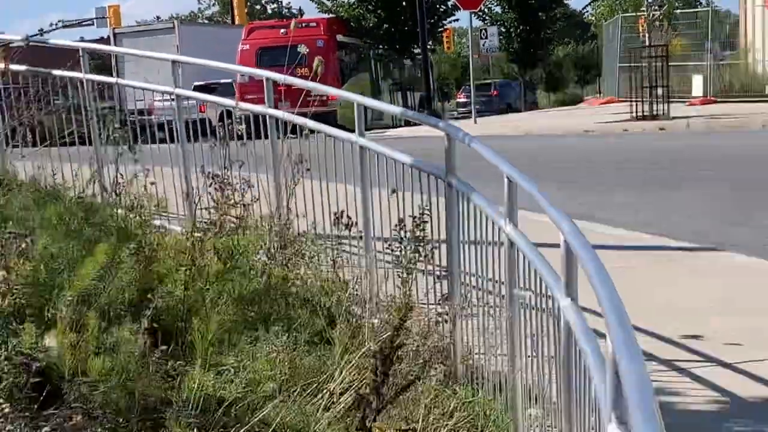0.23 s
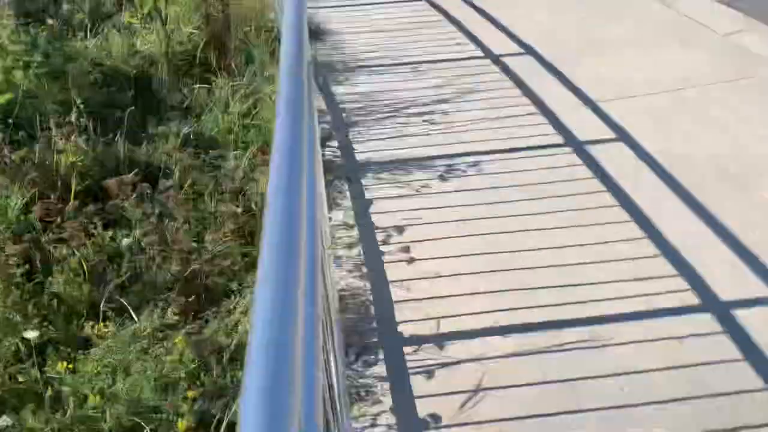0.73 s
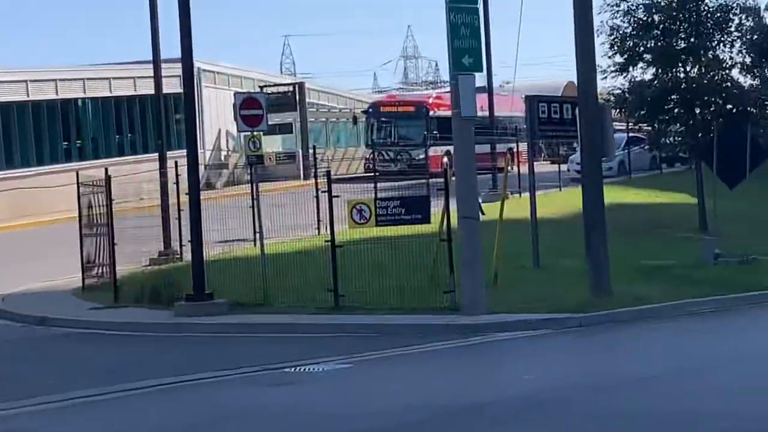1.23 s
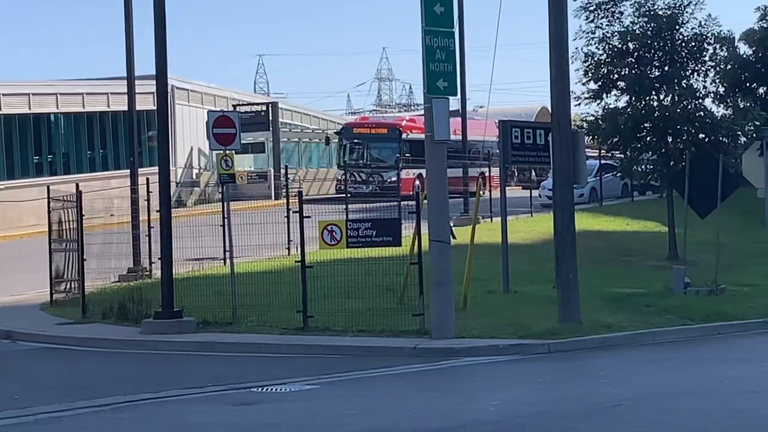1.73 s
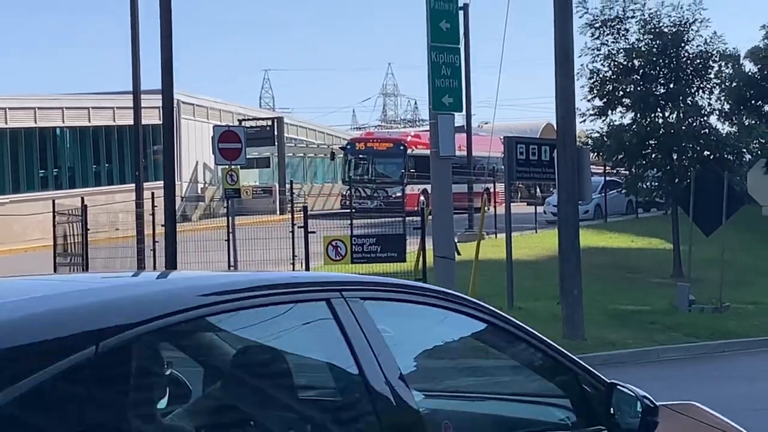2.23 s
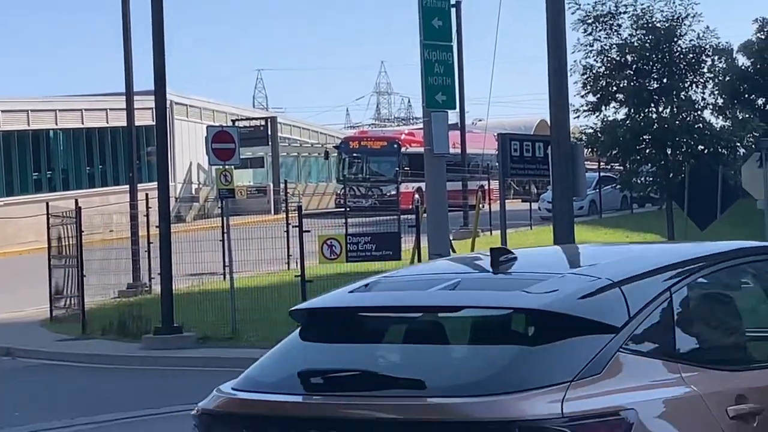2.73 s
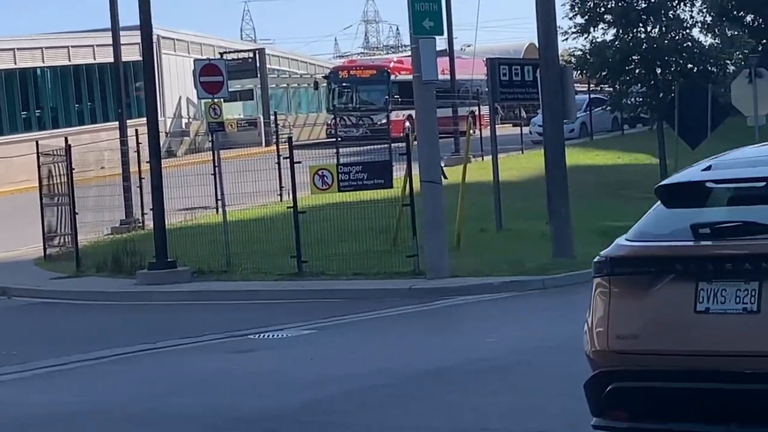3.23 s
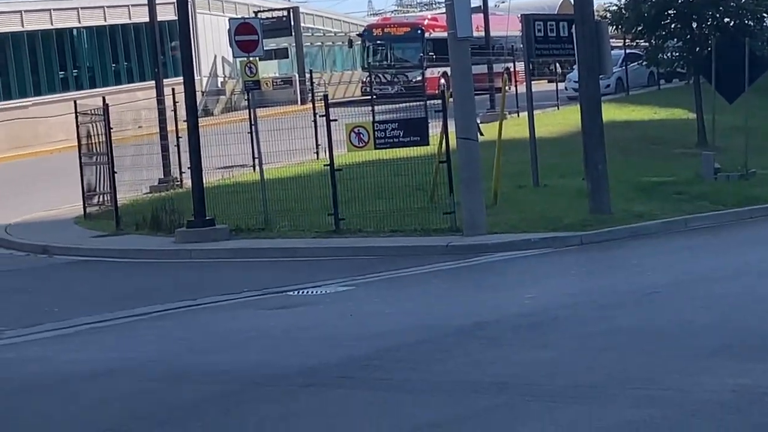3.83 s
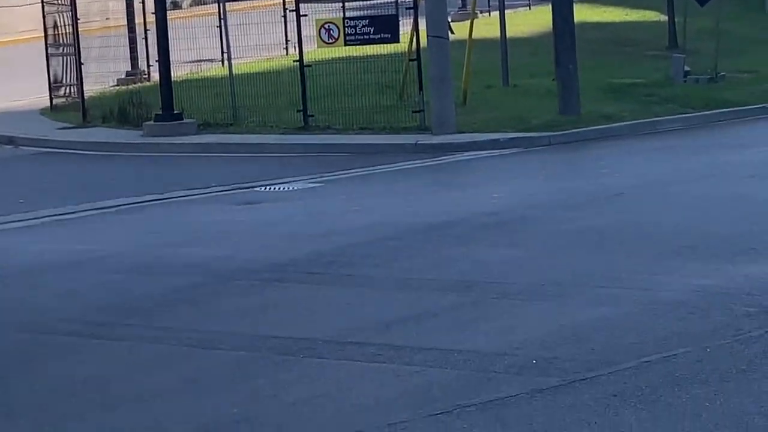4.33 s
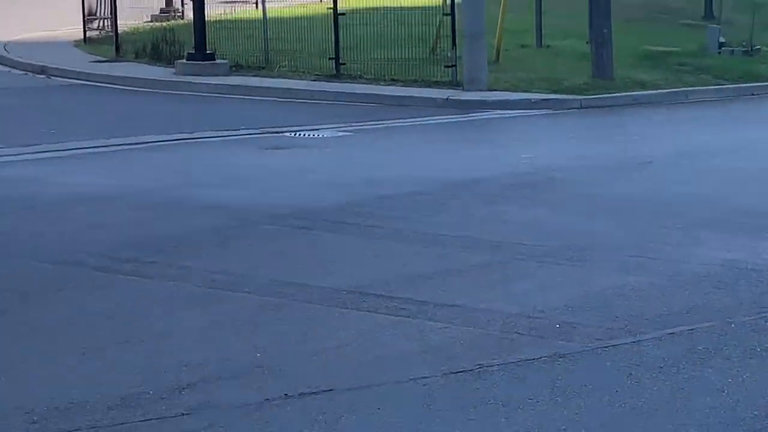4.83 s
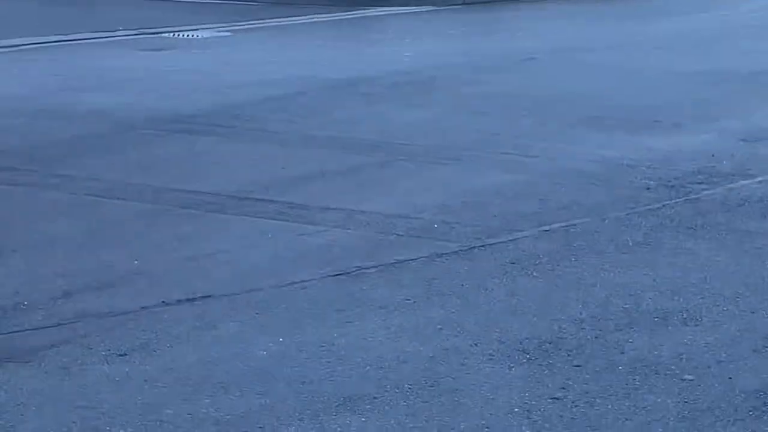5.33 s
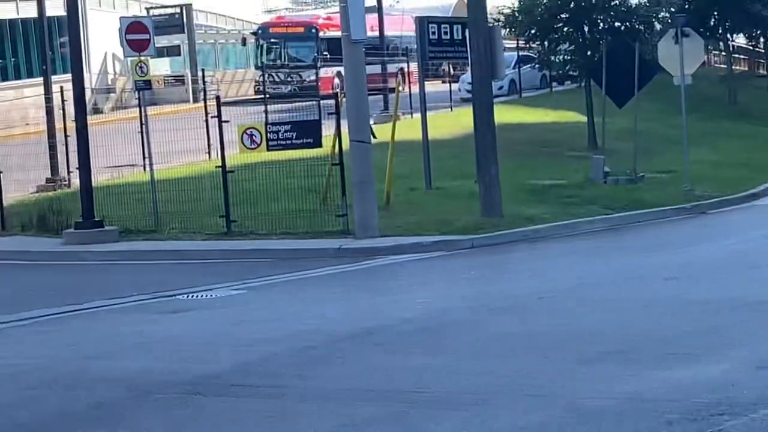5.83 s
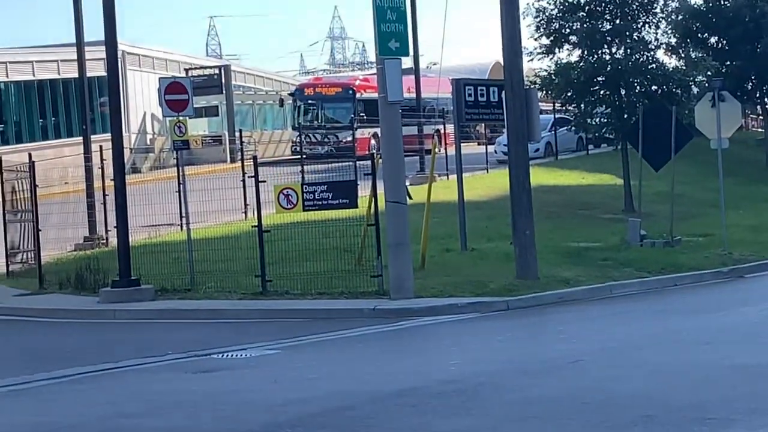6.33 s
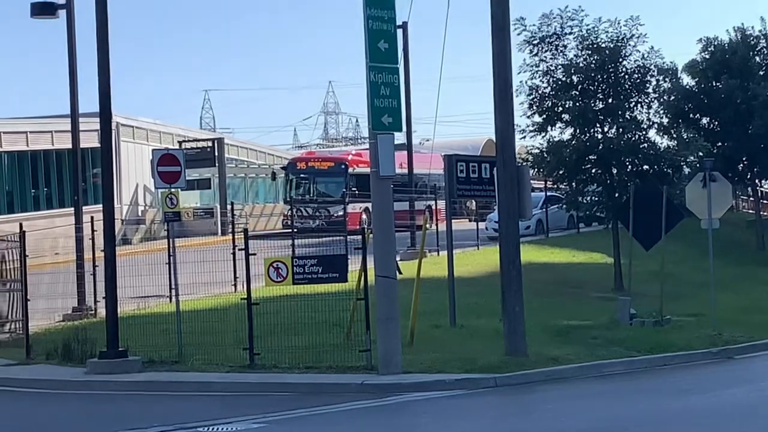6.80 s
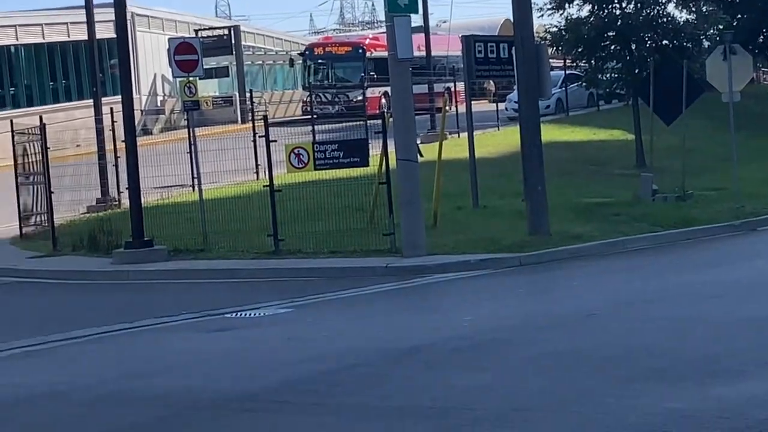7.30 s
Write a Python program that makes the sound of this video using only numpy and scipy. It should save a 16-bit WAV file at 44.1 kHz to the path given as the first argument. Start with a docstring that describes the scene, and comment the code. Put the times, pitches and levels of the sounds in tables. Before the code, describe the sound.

A quiet street corner opens with soft idling rumble and small handling knocks, then cuts abruptly to a bus yard. A deep diesel drone pulls strongly under traffic roar and tyre noise, with soft thuds over a road joint. The engine eases off and wavers, and two blasts of air hiss with a ringing whistle, the second about two seconds later. A handheld camera outdoors ends with a hard bump.

```python
"""A diesel bus pulls gently across a terminal yard: steady tones locked to its crankshaft make the drone,
a fuzzy high tone the turbo, and shaped noise with a ringing whistle two blasts from an air valve.
Behind it, filtered stereo noise makes the traffic roar, tyre wash and thuds of cars over a road joint.
It all opens on a quieter street corner of idling engines and soft noise, then cuts abruptly to the yard.
Knocks on the hand-held camera are clicks, short noise rubs and ringing modes of its case."""
import sys
import numpy as np
from scipy import signal
from scipy.fft import rfft, irfft, next_fast_len
from scipy.io import wavfile
from scipy.ndimage import uniform_filter1d, map_coordinates

SR = 44100
rng = np.random.default_rng(int(sys.argv[2]) if len(sys.argv) > 2 else 0)


def unload_audio(sound):
    """Save the sound as a 16-bit wav file, at the path given as the first command line argument."""
    columns = np.transpose(np.atleast_2d(sound))
    # keep every value between -1 and 1, then stretch to whole-number steps
    steps = np.round(np.clip(columns, -1, 1) * 32767)
    wavfile.write(sys.argv[1], SR, steps.astype(np.int16))


N = 333396

# Noise colours. Each row: frequency in Hz, relative density in dB per Hz (the layer sets the loudness).
CORNER_RUMBLE_COLOUR = [(22, -14), (45, -2.5), (62, -4), (76, -1.5), (92, -11.5), (120, -9), (170, -12),
                        (300, -25), (2000, -120)]
CORNER_STREET_COLOUR = [(150, -4), (330, 0), (700, -6), (1200, -13.5), (2600, -18), (3300, -23),
                        (3750, -19), (4100, -30), (5000, -43.5), (6800, -35), (9000, -53)]
STREET_RUMBLE_COLOUR = [(22, -20), (35, -3.5), (50, -1.5), (65, 3), (100, -4), (130, -6), (180, -4),
                        (240, -19.5), (700, -120)]
ROAR_COLOUR = [(30, -29), (70, -1.5), (100, -2.5), (150, 0.5), (220, -4), (310, -2.5), (430, -5.5),
               (540, -13), (760, -13.5), (1050, -25), (2000, -43.5), (5000, -110)]
TYRE_COLOUR = [(300, -27), (750, 3), (1050, 2.5), (1550, 2.5), (1950, -1), (2450, -3), (3300, -15.5),
               (3800, -13.5), (5400, -24), (6600, -29.5), (7600, -38), (9000, -42), (11000, -32),
               (13000, -58.5)]
BRIGHT_HISS_COLOUR = [(3500, -22), (5000, -7.5), (6500, 6), (7400, -7.5), (9000, -21), (12000, -32.5)]
ROAD_WASH_COLOUR = [(350, -20), (540, -2), (740, 2), (900, -2), (1400, -16), (1900, -20), (3000, -50)]
THUD_COLOUR = [(200, -8), (450, 1.5), (750, 1.5), (980, -1.5), (1400, -17.5), (1700, -16), (2100, -18),
               (2650, -24.5), (3100, -21.5), (3450, -31.5), (3720, -31.5), (4400, -37), (7000, -53)]
HISS_COLOUR = [(700, -32.5), (1300, -6.5), (1750, -1.5), (2400, -0.5), (3300, -3.5), (4200, -3.5),
               (5300, -11.5), (6200, -3.5), (7800, -16.5), (10000, -21), (12000, -32.5), (13000, -48)]
ECHO_COLOUR = [(900, -21), (1800, -2), (2500, 2.5), (3300, -6.5), (5000, -13.5), (7000, -23), (10000, -46)]

# How the two ears relate. Each row: frequency in Hz, likeness from 0 to 1, lead of the left ear in radians.
CORNER_STEREO = [(60, 0.84, 1), (292, 1, 0.7), (600, 0.66, -1.5), (850, 0.86, -1.5), (1150, 0.69, -3),
                 (1500, 0.59, -2.5), (2100, 0.16, 5.5), (2690, 0.13, 0), (3820, 0.42, 3.5),
                 (6500, 0.88, 1.4)]
YARD_STEREO = [(60, 0.89, 0.0), (276, 0.96, 0.16), (423, 0.8, 0.24), (600, 0.57, -1.5), (806, 0.9, -1.5),
               (970, 0.7, -3), (1150, 0.8, 2.5), (1460, 0.2, -1), (1700, 0.8, -1.5), (2300, 0.6, 0),
               (2650, 0.8, -1.6), (3280, 0.6, -4), (4100, 0.35, 1), (5000, 0.21, 3.5), (6400, 0.68, 0.3),
               (7700, 0.46, -1.5), (10000, 0.64, 1.0)]
AIR_STEREO = [(1600, 0.44, -3), (2000, 0.56, 0.2), (2400, 0.47, 1.5), (2800, 0.77, 2), (3300, 0.6, 4),
              (3900, 0.63, 0), (4500, 0.34, -2), (5200, 0.41, 4.5), (6000, 0.13, -3), (6800, 0.42, 1),
              (7700, 0.56, -4), (10000, 0.53, 2)]

# The quiet corner's rumble. Each row: time in seconds, level in dB before the layer's trim.
CORNER_LEVEL = [(0, -40), (0.16, -41.5), (0.32, -39), (0.54, -43.5), (0.7, -35), (0.86, -37)]
# Traffic. Each row: time in seconds, engine roar in dB, tyre noise in dB, both before their trims.
TRAFFIC_LEVELS = [(0.9, -36.5, -48.5), (1.53, -37.5, -49), (4.77, -42, -56), (5.95, -41, -55.5),
                  (7.18, -44.5, -57), (7.4, -47, -57)]
# Bright hiss in the treble: tyre sizzle on asphalt, and a short burst at 4.5 s as the first air blast opens.
# Each row: centre in seconds, half length in seconds, level in dB.
BRIGHT_HISS_SWELLS = [(1.946, 1.4, -74.5), (4.509, 0.11, -71), (5.405, 0.46, -74.5)]
# Road noise of passing and far cars. Each row: centre in seconds, half length in seconds, level in dB.
WASH_SWELLS = [(2.5, .55, -48.5), (7.351, 0.61, -48.5)]
# Wheels over the road joint. Each row: time in seconds, level in dB.
JOINT_HITS = [(1.201, -35), (2.079, -36), (2.829, -32)]

# Knocks on the camera. Each row: time in seconds, case level in dB, tilt in dB per octave around 500 Hz,
# pitch factor of the case, cycles to swell, click level in dB.
KNOCKS = [(0.0211, -35, 5, 0.94, 1.74, -35), (0.0995, -42.5, 2, 1.55, 1.4, -50),
          (0.319, -46, 7, 1.54, 1.7, -43), (0.7224, -27, 7.5, 0.68, 1.1, -37),
          (5.682, -35.5, 2, 1.4, 1.7, -50), (7.4848, -20, -4, 1.07, 1.38, -23.5)]
# Modes of the camera case. Each row: frequency in Hz before the pitch factor, relative level in dB.
CASE_MODES = [(85, -8), (230, -2.5), (520, 4.5), (740, -5.5), (1500, -11.5)]

# Air blasts. Each row: start in seconds, time the valve is open in seconds, hiss level in dB before the
# trim, ringing of the outlet in dB relative to the hiss.
AIR_BLASTS = [(4.555, 0.1, -46, -7), (6.425, 0.14, -46, -7)]
# Resonances of the air outlet. Each row: frequency in Hz, relative level in dB.
OUTLET_MODES = [(1832, -13), (2423, 0), (2897, -1), (3014, -7.5), (3199, -2.5), (3450, -9.5), (3608, -10),
                (3930, -9), (6014, -17.5)]
# The valve's whistle. Each row: partial number, frequency in Hz, lead of the left ear in radians.
WHISTLE_PARTIALS = [(1, 3254, 2.0), (2, 6517, .15)]
# Its held tones. Each row: partial number, start in seconds, level in dB, hold in seconds,
# time to fall 60 dB in seconds.
HELD_WHISTLES = [(1, 4.56, -51, .1, 1.1), (2, 4.57, -61, .29, .6), (1, 6.44, -56, .15, 1.7),
                 (2, 6.44, -61, .34, .9)]
# Its chirps. Each row: partial number, centre in seconds, half length in seconds, level in dB.
WHISTLE_CHIRPS = [(1, 4.65, .04, -47), (1, 4.77, .03, -58), (2, 4.81, .04, -58), (1, 4.9, .045, -56),
                  (1, 5.062, .035, -55), (1, 5.215, .035, -61), (1, 5.31, .03, -72), (1, 6.58, .03, -52),
                  (2, 6.6, .03, -64), (1, 6.71, .025, -51), (2, 6.75, .02, -61), (1, 6.845, .02, -58),
                  (1, 6.93, .03, -60), (1, 7.03, .035, -58.5), (1, 7.125, .025, -67), (1, 7.24, .04, -69)]

# Rising whine. Each row: time in seconds, frequency in Hz, level in dB.
WHINE_PATH = [(0.9, 4080, -86), (1.3, 4370, -72), (1.7, 4860, -73.5), (2.1, 5160, -75), (2.7, 5054, -79),
              (3.3, 5158, -100.5)]
# Turbocharger whistle. Each row: time in seconds, frequency in Hz, level in dB before the trim.
TURBO_PATH = [(0.86, 10200, -69.5), (1.2, 10000, -77.5), (1.6, 9940, -74), (2.0, 9880, -67),
              (2.2, 9930, -65.5), (2.7, 9860, -71.5), (3.0, 9850, -71), (3.4, 9700, -77), (3.9, 9960, -83),
              (4.5, 9800, -105)]
# Boom of the bus body. Each row: time in seconds, level in dB.
BOOM_LEVEL = [(0.9, -40.5), (1.4, -38), (1.9, -35.5), (2.12, -39), (2.42, -33), (2.9, -46), (3.2, -36.5),
              (3.35, -43.5), (5.2, -47), (7.5, -44.5)]
# Swells added to the boom after the engine eases off. Each row: centre in seconds, level in dB.
BOOM_PEAKS = [(3.7, -36.5), (4.24, -37), (4.68, -39), (5.18, -47), (5.8, -41.5), (6.34, -39), (6.84, -37),
              (7.48, -44.5)]
# Engine block as a whole. Each row: time in seconds, level in dB.
BLOCK_LEVEL = [(0.86, -30.5), (1.4, -29), (1.9, -31.5), (2.5, -34.5), (3.0, -38.5), (3.6, -45.5),
               (5.0, -50.5), (7.5, -42)]
# Engine block lines. Each row: multiple of the crankshaft rate, relative level in dB while pulling hard,
# relative level in dB once the load drops.
BLOCK_LINES = [(2, -6, -7.5), (4, -1.5, -4.5), (5, -9.5, -6.5), (7, -17.5, -8), (9, -13, -21),
               (12, -4.5, -7.5), (13, -13, -11), (14, -19.5, -12), (15, -14.5, -11.5), (16, -19.5, -9.5),
               (17, -12, -12.5), (19, -10.5, -14), (21, -20.5, -16), (27, -19.5, -18.5), (32, -20, -16.5)]
# Block lines that flare briefly. Each row: multiple of the crankshaft rate, centre in seconds,
# level in dB relative to the block.
BLOCK_FLARES = [(15, 1.46, -6.5), (19, 1.66, -12), (12, 2.6, -13), (17, 1.88, -13), (14, 2.2, -8.5),
                (16, 2.3, -10), (12, 2.58, -3)]
# Firing rate of the six cylinders. Each row: time in seconds, firings per second in Hz.
FIRING_RATE = [(0.86, 74.62), (1.28, 75.6), (1.65, 77.22), (2.18, 77.15), (2.45, 78.08), (3.1, 78.54),
               (3.7, 78.22), (4.0, 77.4), (4.25, 78.34), (4.48, 77.5), (4.7, 79.84), (4.9, 78.07),
               (5.5, 79.8), (6.15, 78.5), (6.55, 80.2), (6.8, 77.85), (7.15, 79.36), (7.5, 80.94)]
# Exhaust firing tone. Each row: time in seconds, level in dB before the throb.
FIRING_LEVEL = [(0.88, -25), (1.07, -15), (1.32, -23.5), (1.43, -17), (1.85, -23), (2.28, -25),
                (2.38, -19.5), (2.5, -16.5), (2.62, -30.5), (2.8, -27), (3.0, -35), (3.2, -27),
                (3.28, -16.5), (3.36, -15.5), (3.43, -23), (3.55, -18), (3.75, -14), (4.1, -19.5),
                (4.3, -17), (4.44, -18), (4.53, -27.5), (4.64, -18), (4.75, -21), (4.85, -34), (5.35, -31),
                (5.7, -31.5), (5.95, -25.5), (6.25, -25), (6.5, -24.5), (7.05, -32.5), (7.5, -24.5)]
# Octave of the firing tone. Each row: time in seconds, level in dB before the trim.
OCTAVE_LEVEL = [(0.88, -18.5), (1.15, -21.5), (1.22, -27), (1.95, -20.5), (2.2, -30), (2.85, -25.5),
                (3.2, -30), (3.3, -48), (3.8, -34), (4.9, -35.5), (5.2, -29.5), (5.5, -37.5), (6.9, -41.5),
                (7.1, -34), (7.5, -29)]

CUT_S = 0.8652  # the corner gives way to the yard
TOP_HZ = 12400  # band limit of the camera
EASE_S, EASE_LENGTH_S = 3.22, 0.056  # the engine eases off
UNLOAD_S, UNLOAD_LENGTH_S = 2.05, .3  # the load drops and the block's lines change balance
ENGINE_WAVER = .1  # share of wavering tone while the engine pulls
THROB_FROM_S, THROB_LENGTH_S, THROB_HZ, THROB_DB = 3.95, 0.5, 6.05, 3.5
FLARE_S, BOOM_SWELL_S = 0.089, 0.12  # half lengths
RISE_S = 0.08  # build-up of the air flow
HISS_T60_S, RING_T60_S, ECHO_T60_S = 0.82, 1.0, 1.5  # time to fall 60 dB
ECHO_DELAY_S, ECHO_DB = 0.17, -9.5  # echo of the hiss from the buildings


def amp(db):
    """Decibels to gain."""
    return 10 ** (np.asarray(db) / 20)


def unit(x):
    """Scale to rms 1."""
    return x / np.sqrt(np.mean(x ** 2) + 1e-20)


def clock():
    """The time of every sample, in seconds."""
    return np.arange(N) / SR


def along(points, hz):
    """Read (Hz, value) points on a log frequency axis."""
    f, v = np.transpose(points)
    return np.interp(np.log(hz + 1), np.log(f + 1), v)


def curves(rows):
    """One value per sample for each column after the time."""
    s, *columns = np.transpose(rows)
    return [np.interp(clock(), s, column) for column in columns]


def ramp(centre_s, length_s):
    """A straight move from 0 to 1 around a moment."""
    return np.clip((clock() - centre_s) / length_s + .5, 0, 1)


def swell(s, half_length, db):
    """The gain of a sound that comes and goes around time s."""
    return amp(db) * np.exp(-((clock() - s) / half_length) ** 2)


def wobble(rate):
    """A smooth random curve with `rate` random points a second, traced every 32 samples."""
    knots = np.arange(0, N + 32, 32)
    points = rng.standard_normal(8192)
    smooth = map_coordinates(points, [knots * rate / SR + 2], mode="wrap")
    return np.interp(np.arange(N), knots, smooth)


def scattered(phase, rate):
    """A tone of about rms 1 arriving over many shifting paths, so that it fades and wavers."""
    return wobble(rate) * np.sin(phase) + wobble(rate) * np.cos(phase)


def filtered(x, response):
    """Shape x by a gain for each frequency."""
    m = next_fast_len(N + SR // 2)
    return irfft(rfft(x, m) * response(np.fft.rfftfreq(m, 1 / SR)), m)[..., :N]


def spread(mid, side):
    """Left and right from mid and side."""
    return np.array([mid + side, mid - side])


def rush(spectrum, ears, patchy_db, ripple_db):
    """Stereo noise, patchy in time and pitch, with the fixed ripple of walls; its middle has rms 1."""
    z = signal.stft(rng.standard_normal((2, N)), nperseg=512)[2]
    patches = uniform_filter1d(rng.standard_normal(z.shape[1:]), size=8, axis=0)
    patches = uniform_filter1d(patches, size=12, axis=1)
    pair = signal.istft(z * amp(patchy_db * unit(patches)), nperseg=512)[1][:, :N]

    m = next_fast_len(N + SR // 2)
    hz, (a, b) = np.fft.rfftfreq(m, 1 / SR), rfft(pair, m)
    f, likeness, lead = np.transpose(ears)
    shared = np.interp(hz, f, np.clip(likeness, 0, .99) * np.exp(-1j * lead))
    right = shared * a + np.sqrt(1 - abs(shared) ** 2) * b

    # a random point every 25 Hz, clipped on one side, above 500 Hz only
    ripple = np.interp(hz, np.arange(1000) * 25, np.minimum(rng.standard_normal(1000), .7)) * (hz > 500)
    gain = amp(along(spectrum, hz) + ripple_db * ripple) * (hz > 20)
    gain = gain / np.sqrt(1 + shared.real)  # keeps the colour of the middle
    out = irfft(gain * np.array([a, right]), m)[:, :N]
    return out / np.std(out.mean(0))


def corner(rumble_db=1.5, street_db=-50, idle_hz=77.5, idle_db=-9):
    """Distant engines idle as a wavering tone in low noise, under a soft wash of street noise."""
    idle = amp(idle_db) * scattered(2 * np.pi * idle_hz * clock(), rate=12.93)
    rumble = rush(CORNER_RUMBLE_COLOUR, CORNER_STEREO, patchy_db=-1.3, ripple_db=0)
    low = amp(curves(CORNER_LEVEL)[0] + rumble_db) * (rumble + idle)
    street = rush(CORNER_STREET_COLOUR, CORNER_STEREO, patchy_db=.8, ripple_db=3.7)
    return low + amp(street_db) * street


def street_rumble(level_db=-33, swell_db=1.5):
    """The deep rumble of the surrounding streets, gently rising and falling."""
    gain = amp(level_db + swell_db * wobble(5.6))
    return gain * rush(STREET_RUMBLE_COLOUR, YARD_STEREO, patchy_db=1.5, ripple_db=-2.5)


def traffic(angle, roar_db=6.0, tyre_db=3.5, clatter=0.031):
    """Low engine roar, and tyre noise mixed with diesel clatter that pulses at each firing of the bus."""
    roar, tyres = curves(TRAFFIC_LEVELS)
    low_gain = amp(roar + roar_db + 0.76 * wobble(9))
    low = low_gain * rush(ROAR_COLOUR, YARD_STEREO, patchy_db=1.0, ripple_db=2.0)
    high_gain = amp(tyres + tyre_db + 0.19 * wobble(12)) * (1 + clatter * np.cos(3 * angle))
    high = high_gain * rush(TYRE_COLOUR, YARD_STEREO, patchy_db=1.36, ripple_db=3.5)
    return low + high


def bright_hiss(floor_db=-88):
    """Treble noise swells over a very faint floor: tyre sizzle, and a burst as the first air blast opens."""
    gain = amp(floor_db) + sum(swell(*row) for row in BRIGHT_HISS_SWELLS)
    hiss = rush(BRIGHT_HISS_COLOUR, YARD_STEREO, patchy_db=2.0, ripple_db=1.5)
    return gain * amp(0.73 * wobble(24)) * hiss


def road_wash():
    """A broad wash of tyres on asphalt swells as cars go by."""
    gain = sum(swell(*row) for row in WASH_SWELLS)
    return gain * rush(ROAD_WASH_COLOUR, YARD_STEREO, patchy_db=1.2, ripple_db=1.5)


def wheel_thuds(rise_s=0.011, decay_s=0.027):
    """Tyres of passing cars roll into a joint in the road: soft knocks of quickly rising and fading noise."""
    gain = np.zeros(N)
    for s, db in JOINT_HITS:
        since = clock() - s
        gain += amp(db) * np.exp(np.minimum(since / rise_s, -since / decay_s))
    return gain * rush(THUD_COLOUR, YARD_STEREO, patchy_db=0.0, ripple_db=1.0)


def tick(cycles, decay_cycles=0.41):
    """A click that is over within a cycle or two."""
    return np.sin(2 * np.pi * cycles) * np.exp(-cycles / decay_cycles)


def bumps(click_hz=3600, rebound_s=.0043, rebound_db=-9, rebound_pitch=.8,
          rub_db=-21, rub_t60=.07, dull_hz=5200):
    """A finger knocks the camera: click, rebound, brief rub, and case modes, the low ones swelling last."""
    knocks, rubs = np.zeros(N + SR), np.zeros((2, N + SR))
    t = np.arange(SR // 6) / SR
    for s, db, tilt_db, pitch, swell_cycles, click_db in KNOCKS:
        span = slice(round(s * SR), round(s * SR) + len(t))
        for hz, level in CASE_MODES:
            cycles = hz * pitch * t
            age = (cycles / swell_cycles) ** 2.34
            mode_gain = amp(db + level + tilt_db * np.log2(hz / 500))
            knocks[span] -= mode_gain * age * np.exp(1 - age) * np.sin(2 * np.pi * cycles)
        click = tick(click_hz * t)
        rebound = tick(click_hz * rebound_pitch * np.maximum(t - rebound_s, 0))
        knocks[span] += amp(click_db) * (click + amp(rebound_db) * rebound)
        rub_gain = amp(click_db + rub_db - 60 * t / rub_t60)
        rubs[:, span] += rub_gain * rng.standard_normal((2, len(t)))
    return filtered((knocks + rubs)[:, :N], lambda hz: 1 / (1 + (hz / dull_hz) ** 10))


def flow(t, open_s, t60):
    """The gain of a blast t after its start: it rises, holds while the valve is open, then dies away."""
    return np.clip(t / RISE_S, 0, 1) ** 1.2 * amp(-60 * np.maximum(t - open_s, 0) / t60)


def air_blasts(level_db=4, pan_db=0.9):
    """Compressed air rasps out through a ringing outlet, and a duller echo lingers between the buildings."""
    hiss_gain, ring_gain, echo_gain = np.zeros((3, N))
    for s, open_s, db, ring_db in AIR_BLASTS:
        since = clock() - s
        hiss_gain += amp(db) * flow(since, open_s, HISS_T60_S)
        ring_gain += amp(db + ring_db) * flow(since, open_s, RING_T60_S)
        echo_gain += amp(db + ECHO_DB) * flow(since - ECHO_DELAY_S, open_s, ECHO_T60_S)

    ring = np.zeros((2, N))
    for hz, db in OUTLET_MODES:
        phase = 2 * np.pi * hz * clock()
        ring += amp(db) * np.array([scattered(phase, rate=70) for ear in range(2)])

    hiss = amp(1.0 * wobble(130)) * rush(HISS_COLOUR, AIR_STEREO, patchy_db=2.0, ripple_db=3.5)
    echo = rush(ECHO_COLOUR, AIR_STEREO, patchy_db=2.5, ripple_db=5.0)
    pan = amp([[-pan_db], [pan_db]])  # slightly to the right
    return amp(level_db) * pan * (hiss_gain * hiss + ring_gain * ring + echo_gain * echo)


def valve_whistle(diffuse=.4, flutter_db=1.2):
    """The escaping air whistles a tone and roughly its octave, held and then broken into fading chirps."""
    out = np.zeros((2, N))
    for partial, hz, lead in WHISTLE_PARTIALS:
        phase = 2 * np.pi * hz * clock()
        tone = np.array([np.sin(phase + way * lead / 2) + diffuse * scattered(phase, rate=45)
                         for way in (1, -1)])
        held = sum(amp(db) * flow(clock() - s, held_s, t60)
                   for k, s, db, held_s, t60 in HELD_WHISTLES if k == partial)
        chirps = sum(swell(s, half_length, db)
                     for k, s, half_length, db in WHISTLE_CHIRPS if k == partial)
        out += unit(tone) * (held + chirps) * amp(flutter_db * wobble(28))
    return out


def whine(jitter=.003, flicker_db=1.5):
    """A thin tone climbs as the engine takes up load, fading in and out of the noise."""
    hz, db = curves(WHINE_PATH)
    phase = 2 * np.pi * np.cumsum(hz * (1 + jitter * wobble(30))) / SR
    gain = amp(db + flicker_db * wobble(12))
    return gain * spread(scattered(phase, rate=44), .5 * scattered(phase, rate=40))


def turbo(level_db=-1, rush_hz=10600, rush_db=-76, rush_end_s=1.8, rush_width=.02):
    """A faint fuzzy whistle that sinks as the boost drops; early on, air rushes just above it."""
    hz, db = curves(TURBO_PATH)
    phase = 2 * np.pi * np.cumsum(hz * (1 + .004 * wobble(60))) / SR
    whistle = amp(db + level_db) * spread(scattered(phase, rate=410), scattered(phase, rate=300))
    airy = 2 * np.pi * np.cumsum(rush_hz * (1 + rush_width * wobble(500))) / SR
    boost = np.clip((rush_end_s - clock()) / 0.072, 0, 1)
    air = amp(rush_db) * boost * spread(scattered(airy, rate=600), scattered(airy, rate=600))
    return whistle + air


def crank():
    """Angle of the crankshaft, slightly unsteady; six cylinders fire three times a turn."""
    firing_hz, = curves(FIRING_RATE)
    turns_hz = firing_hz / 3 * (1 + .003 * wobble(14))
    return 2 * np.pi * np.cumsum(turns_hz) / SR


def easing(phase, rate, late=0.9):
    """An engine tone of about rms 1: nearly clean while the engine pulls, wavering once it has eased off."""
    eased = ramp(EASE_S, EASE_LENGTH_S)
    diffuse = np.clip(ENGINE_WAVER + (late - ENGINE_WAVER) * eased, 0, 1)
    return np.sqrt(2 * (1 - diffuse ** 2)) * np.sin(phase) + diffuse * scattered(phase, rate)


def body(angle, eleventh_db=-3, side_db=-16):
    """The bus body booms at ten and eleven times the crankshaft rate, swelling after the engine eases off."""
    tenth, eleventh = 10 * angle, 11 * angle
    mid = easing(tenth, rate=18) + amp(eleventh_db) * easing(eleventh, rate=18)
    gain = amp(curves(BOOM_LEVEL)[0]) + sum(swell(s, BOOM_SWELL_S, db) for s, db in BOOM_PEAKS)
    return gain * spread(mid, amp(side_db) * scattered(tenth, rate=16))


def block(angle, side_db=-16):
    """Unequal cylinders shake the block at crankshaft multiples; some flare as they meet a panel resonance."""
    mid, side = np.zeros(N), np.zeros(N)
    unloaded = ramp(UNLOAD_S, UNLOAD_LENGTH_S)
    for order, pulling_db, light_db in BLOCK_LINES:
        phase = order * angle + rng.uniform(0, 2 * np.pi)
        flare = sum(swell(s, FLARE_S, db) for line, s, db in BLOCK_FLARES if line == order)
        gain = amp(pulling_db) * (1 - unloaded) + amp(light_db) * unloaded + flare
        mid += gain * (np.sin(phase) + ENGINE_WAVER * scattered(phase, rate=7))
        side += gain * amp(side_db) * np.sin(phase + rng.uniform(0, 2 * np.pi))
    return amp(curves(BLOCK_LEVEL)[0]) * spread(mid, side)


def exhaust(angle, echo_db=-31.5, octave_db=-0.5, rough=0.057, side_db=-21):
    """The firing tone mingles with its reflections and later throbs; its octave wavers after easing off."""
    firing = 3 * angle
    since = clock() - THROB_FROM_S
    throbbing = np.clip(2 * THROB_HZ * np.minimum(since, THROB_LENGTH_S - since), 0, 1)
    throb_db = THROB_DB * throbbing * np.cos(2 * np.pi * THROB_HZ * since)
    low_gain = amp(curves(FIRING_LEVEL)[0] + throb_db)
    direct = low_gain * np.sqrt(2) * np.sin(firing) * (1 + rough * wobble(26))
    tone = direct + amp(echo_db) * scattered(firing, rate=22)
    tone_side = -.05 * tone + low_gain * amp(side_db) * np.cos(firing)
    octave = amp(curves(OCTAVE_LEVEL)[0] + octave_db) * easing(2 * firing + np.pi / 2, rate=17)
    return spread(tone, tone_side) + spread(octave, .09 * octave)


def scene():
    """The quiet corner, then at once the yard with the bus; knocks on the camera run over both."""
    angle = crank()
    street = street_rumble() + traffic(angle) + bright_hiss() + road_wash() + wheel_thuds()
    air = air_blasts() + valve_whistle()
    bus = whine() + turbo() + body(angle) + block(angle) + exhaust(angle)
    return np.where(clock() < CUT_S, corner(), street + air + bus) + bumps()


def record(dry):
    """The camera keeps nothing above its band limit."""
    return filtered(dry, lambda hz: hz < TOP_HZ)


dry = scene()
out = record(dry)
unload_audio(out)
```